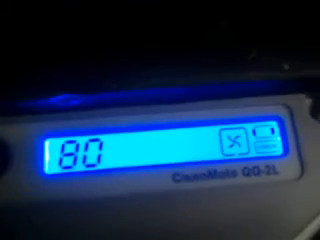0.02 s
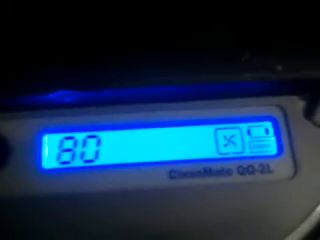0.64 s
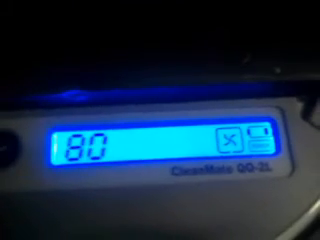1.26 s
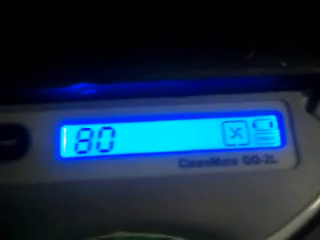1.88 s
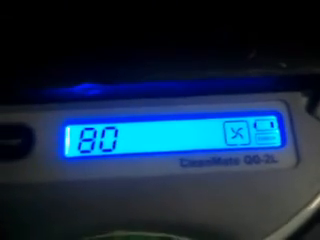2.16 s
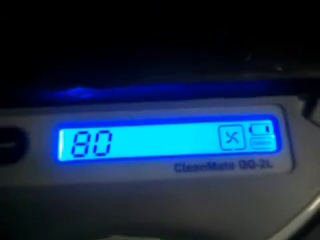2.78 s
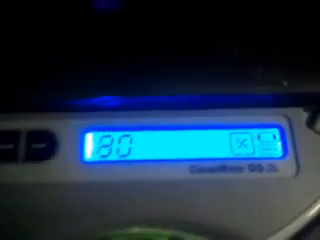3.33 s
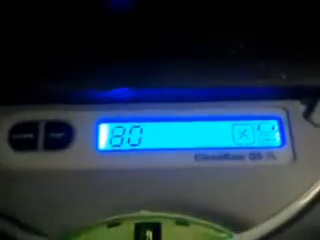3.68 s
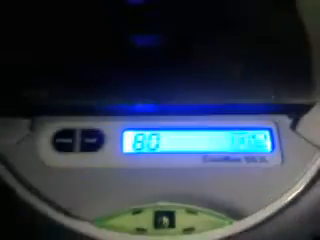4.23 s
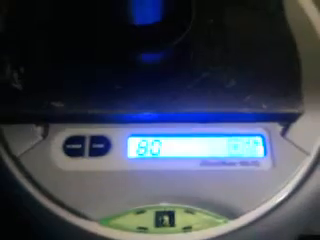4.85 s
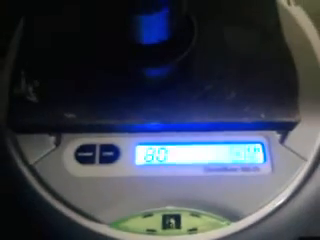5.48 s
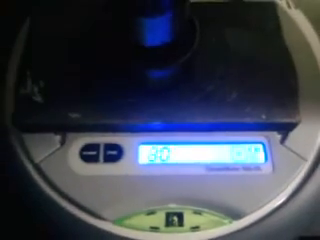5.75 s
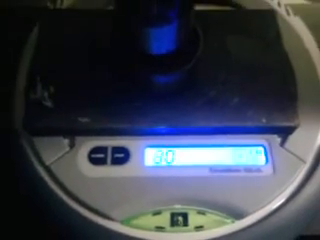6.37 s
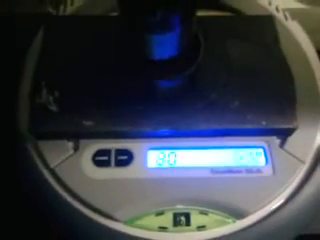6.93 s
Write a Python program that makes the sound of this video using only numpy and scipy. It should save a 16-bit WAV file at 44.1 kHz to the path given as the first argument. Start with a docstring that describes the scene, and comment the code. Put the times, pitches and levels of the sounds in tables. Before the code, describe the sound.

A robot vacuum runs very close, its slipping gear rattling loudly about ten times a second over a steady motor hum and rushing fan.

```python
"""A small room, with a narrow-band camera microphone very close to a running robot vacuum.
Its stripped gear skips about ten times a second, each skip a knock and a short rasp of teeth
in the plastic shell, loud enough to overload the microphone. Behind it the motor hums steadily,
the fan rushes and loose plastic ticks. About halfway through, the microphone draws back
from the vacuum's display to above its lid, and the colour of the sound shifts."""
import sys
import numpy as np
from scipy import signal
from scipy.fft import rfft, irfft
from scipy.io import wavfile
from scipy.ndimage import uniform_filter1d

SR = 44100
rng = np.random.default_rng(int(sys.argv[2]) if len(sys.argv) > 2 else 0)


def bounce(signal):
    """Save signal as a 16-bit WAV file at the path given by the first command-line argument."""
    frames = np.transpose(np.atleast_2d(signal))
    limited = np.clip(frames, -1, 1)
    pcm = np.round(limited * 32767).astype(np.int16)
    wavfile.write(sys.argv[1], SR, pcm)


N = 308700
TIME, FREQS = np.arange(N) / SR, np.fft.rfftfreq(N, 1 / SR)

# the stripped gear slowly runs down: (time [s], speed [turns/s])
GEAR_SPEED = [(0.0, 11.147), (0.7, 10.578), (1.1, 10.856), (3.1, 10.609), (3.5, 10.631), (3.9, 10.408),
              (4.3, 10.474), (5.5, 10.432), (6.1, 10.228), (7.0, 10.191)]
# load on the gear, which sets the force of its skips: (time [s], level [dB])
GEAR_LOAD = [(0.0, -9), (0.6, -10.5), (1.3, -8), (2.1, -8), (3.1, -10), (4.7, -9), (5.35, -6.5),
             (5.8, -8.5), (6.4, -7), (7.0, -6.5)]
# the gear bites hard or only slithers: (time [s], force above the load [dB])
ODD_SKIPS = [(0, -6.5), (0.35, -2), (0.445, 4), (1.283, 2.5), (1.65, -5.5), (1.744, -2.5), (2.303, -2.5),
             (2.391, -2), (2.49, 4), (3.621, 2.5), (4.194, 2), (6.6, -2)]
# force through one skip: (time [share of its length], level [dB])
SKIP_ENVELOPE = [(0, -19), (.03, -5.5), (.2, -1.4), (.5, 1), (.75, -1.5), (1.1, -7), (1.35, -12.5),
                 (1.9, -38)]
# a single tooth catches between skips: (time [s], force [dB])
TOOTH_SNAGS = [(6.773, -2)]
# colour of the plastic shell: (frequency [Hz], level [dB])
SHELL_COLOUR = [(40, -23), (100, -9), (250, -15.5), (500, -8.5), (900, -10.5), (1400, -7), (2100, -1.5),
                (2600, 0.5), (3000, -3.5), (3500, -2), (5000, -14)]
# shell resonances: (frequency [Hz], width [Hz], lift at the display [dB], lift above the lid [dB])
SHELL_MODES = [(1252, 42, 3.5, 6), (1377, 100, 5, 3.5), (1543, 110, 1.5, 3.5), (1678, 35, 4, 3.5),
               (1837, 52, 0, 3), (2070, 59, 3.5, 6.5), (2295, 70, 3, 4), (2507, 45, 3, 6),
               (3375, 164, 5.5, 1.5)]
# a hollow mid ring comes and goes as the microphone moves: (time [s], ring added [share])
HOLLOW_RING = [(0, 0.49), (3.8, 0), (4.15, 0.66), (4.6, 0.84), (5.2, 0.55), (7, 0)]
# dull thud of the jolted chassis: (frequency [Hz], level [dB])
CHASSIS_COLOUR = [(20, -27), (50, -8), (85, 0), (130, -3), (250, -27), (800, -55)]
# motor hum: (harmonic [multiple of shaft speed], level at the display [dB], level above the lid [dB])
HUM_HARMONICS = [(8, -39.5, -53), (10, -36, -36), (12, -36.5, -29.5), (13, -31, -28), (14, -34, -30.5),
                 (17, -24, -25.5), (18, -34.5, -28), (19, -30, -29.5), (20, -40, -55), (22, -55, -33),
                 (23, -39.5, -33), (29, -40, -31.5), (30, -58, -29.5), (31, -37, -41), (32, -41.5, -49),
                 (36, -32, -27), (42, -46.5, -39), (49, -54, -41.5), (50, -45, -36), (53, -34, -51)]
# rush of fan and brushes: (frequency [Hz], level at the display [dB], level above the lid [dB])
RUSH_COLOUR = [(20, -48, -19), (61, -3.5, -13), (122, -9, -3), (189, 2, 2.5), (310, -0.5, 0),
               (460, 0.5, 0.5), (706, -0.5, 1), (890, -5.5, -0.5), (1110, 1, 1), (1470, -5, -4),
               (2090, -3.5, -3.5), (2670, -4, -13.5), (3210, -15, -3), (3500, -16.5, -14.5)]
# air resonances of the dust bin: (frequency [Hz], width [Hz], lift [dB])
BIN_MODES = [(352.4, 22.3, 11.5), (388, 90, 8)]
# the microphone draws back from the display to above the lid: (time [s], distance [share of the way])
MIC_PATH = [(0, 0.039), (3.2, 0), (4.3, 0.93), (7, 0.97)]
# the microphone passes little above the speech band: (frequency [Hz], gain [dB])
MIC_RESPONSE = [(3450, -1), (3650, -10), (4000, -16), (4400, -25.5), (4800, -60), (6000, -70)]


def gear(away, knock_db=12.5, rasp_db=2.0, thud_db=-32):
    """Up close, the stripped gear lets go with a knock, rasps in the shell and jolts the chassis."""
    share, envelope_db = np.transpose(SKIP_ENVELOPE)
    force, knocks = np.zeros(N), np.zeros(N)
    t = np.arange(SR // 10) / SR
    strokes = skips()
    for s, db, length in strokes:
        add(force, s, amp(db + np.interp(t / length, share, envelope_db, right=-100)))
    for s, db, *_ in strokes + list(TOOTH_SNAGS):
        add(knocks, s, amp([db + knock_db]))
    thud = force * unit(colour(rng.standard_normal(N), contour(CHASSIS_COLOUR)))
    rasp = shell(room(force * teeth() + knocks), away)
    return amp(rasp_db) * rasp + amp(thud_db) * thud


def skips(start_turn=0.139, skip_s=0.037, drag_per_db=0.06, lead=0.6, scatter_db=0.55, scatter_s=0.0007):
    """The gear skips once a turn: (time [s], force [dB], length [s]) for each skip."""
    turns = start_turn + np.cumsum(along(GEAR_SPEED, TIME)) / SR
    first_s = -start_turn / GEAR_SPEED[0][1]
    times = np.interp(np.arange(int(turns[-1]) + 1), turns, TIME, left=first_s)
    chance_force, chance_time = rng.standard_normal((len(times), 2)).T
    bite_db = scatter_db * chance_force
    for s, db in ODD_SKIPS:
        bite_db[np.argmin(abs(times - s))] += db
    lengths = skip_s * np.exp(-drag_per_db * bite_db)  # weak skips drag on
    starts = times - lead * (lengths - skip_s) + scatter_s * chance_time  # and let go early
    return list(zip(starts, along(GEAR_LOAD, times) + bite_db, lengths))


def teeth(tooth_hz=372.7, jitter=0.12, chatter_s=0.0013, scrape=1.0):
    """Each tooth jumps past with a brief chatter; between teeth the tips scrape."""
    passed = np.cumsum(tooth_hz * np.exp(jitter * drift(150))) / SR
    since_s = passed % 1 / tooth_hz
    friction = shifting_contact(rng.standard_normal(N))
    return unit((scrape + np.exp(-since_s / chatter_s)) * friction)


def shifting_contact(x, patch_db=2.0, patch_cells=9):
    """The teeth keep meeting at new spots, so the colour of the rasp shifts at random."""
    spectra = signal.stft(x, nperseg=1024)[2]
    patches = rng.standard_normal(spectra.shape)
    for axis in (0, 1):  # smooth over frequency, then time
        patches = uniform_filter1d(patches, patch_cells, axis)
    shifted = signal.istft(spectra * amp(patch_db * unit(patches)))[1]
    return unit(shifted[:N])


def shell(x, away, hollow_hz=1830, hollow_q=3):
    """The plastic shell colours a force; its resonances differ with the microphone's position."""
    modes = np.array(SHELL_MODES)
    near_db, far_db = (contour(SHELL_COLOUR, modes[:, [0, 1, place]]) for place in (2, 3))
    rms_at_mic = np.sqrt(np.mean(amp(near_db + contour(MIC_RESPONSE)) ** 2))
    ring = signal.lfilter(*signal.iirpeak(hollow_hz, hollow_q, fs=SR), x)
    x = x + along(HOLLOW_RING, TIME) * ring
    return ((1 - away) * colour(x, near_db) + away * colour(x, far_db)) / rms_at_mic


def motor(away, shaft_hz=21.235, hum_db=0.87, wow=0.00075, waver_db=1.86, throb_db=1.73, throb_hz=18):
    """The motor hums at multiples of its shaft speed, roughly in step, so it pulses once a turn."""
    turns = np.cumsum(shaft_hz * (1 + wow * drift(3.1))) / SR
    hum = np.zeros(N)
    for multiple, near_db, far_db in HUM_HARMONICS:
        level = amp(hum_db + near_db + (far_db - near_db) * away + waver_db * drift(20))
        lag_cycles = 0.15 * rng.standard_normal()
        hum += level * np.sqrt(2) * np.sin(2 * np.pi * (round(multiple) * turns + lag_cycles))
    return hum * amp(throb_db * drift(throb_hz))  # the uneven load shakes all of the hum together


def fan(away, rush_db=-18.0, flutter_db=2.0, flutter_hz=47):
    """Behind the gear, turbulent air booms in the dust bin and flutters over the brushes."""
    rush = np.array(RUSH_COLOUR)
    air = rng.standard_normal(N) * amp(flutter_db * drift(flutter_hz))
    near, far = (colour(air, contour(rush[:, [0, place]], BIN_MODES)) for place in (1, 2))
    rms_at_mic = np.std(colour(near, contour(MIC_RESPONSE)))
    return amp(rush_db) * ((1 - away) * near + away * far) / rms_at_mic


def loose_parts(away, ticks_per_s=160, spread_db=3.0, tick_db=-27):
    """In the background, loose plastic ticks faintly against the shell all the time."""
    blows = (rng.random(N) < ticks_per_s / SR) * rng.choice([-1, 1], N)
    strength = amp(spread_db * np.minimum(rng.exponential(1, N), 4))
    ticks = unit(room(blows * strength, t60_s=0.035, wet_db=0))
    return amp(tick_db) * shell(ticks, away)


def room(x, t60_s=0.2, wet_db=-9):
    """The small room stores the power of a sound and lets it die away as diffuse noise."""
    keep = amp(-60 / (t60_s * SR)) ** 2
    stored = signal.lfilter([1 - keep], [1, -keep], x ** 2)
    return x + amp(wet_db) * np.sqrt(stored) * rng.standard_normal(N)


def limiter(x, threshold_db=-12.5, share=0.3, attack_s=0.0014, recover_db_per_s=100):
    """The gain drops on each loud skip, so the hum ducks and swells back between them."""
    keep = np.exp(-1 / (attack_s * SR))
    power_db = 10 * np.log10(signal.lfilter([1 - keep], [1, -keep], x ** 2) + 1e-12)
    fall_db = recover_db_per_s * TIME
    held_db = np.maximum.accumulate(power_db + fall_db) - fall_db
    return x * amp(-share * np.maximum(held_db - threshold_db, 0))


def amp(db):
    """Decibels to gain."""
    return 10 ** (np.asarray(db) / 20)


def unit(x):
    """Scales to rms 1."""
    return x / np.sqrt(np.mean(x ** 2) + 1e-20)


def along(points, times):
    """Value of a (time, value) table at the given times."""
    return np.interp(times, *np.transpose(points))


def contour(points, modes=()):
    """Gain in dB at every frequency: a smooth outline plus resonance humps."""
    hz, db = np.transpose(points)
    outline = np.interp(np.log(FREQS + 1), np.log(hz + 1), db)
    return outline + sum(lift / (1 + (2 * (FREQS - f) / width) ** 2) for f, width, lift in modes)


def colour(x, db):
    """Causal filter with the given gain: resonances ring after a blow, never before."""
    cepstrum = irfft(db * np.log(10) / 20, N)
    cepstrum[1:N // 2] *= 2
    cepstrum[N // 2 + 1:] = 0
    return irfft(rfft(x) * np.exp(rfft(cepstrum)), N)


def drift(rate_hz):
    """Slow random wander of rms 1."""
    spectrum = rfft(rng.standard_normal(N))
    return unit(irfft(spectrum * np.exp(-(FREQS / rate_hz) ** 2), N))


def add(mix, s, sound):
    """Mixes a sound in at time s."""
    start = round(s * SR)
    sound = sound[max(-start, 0):]
    part = mix[max(start, 0):][:len(sound)]
    part += sound[:len(part)]


def scene():
    """Gear, motor, fan and loose parts at one close, moving microphone."""
    away = np.clip(along(MIC_PATH, TIME), 0, 1)  # 0 at the display, 1 above the lid
    return (gear(away) + motor(away) + fan(away) + loose_parts(away))[None]


def record(dry, drive_db=1.0, ceiling=0.73, knee=17, cutoff_hz=15800):
    """The narrow-band microphone overloads on the skips despite its limiter, making the high treble."""
    narrow = limiter(amp(drive_db) * colour(dry[0], contour(MIC_RESPONSE)))
    overloaded = narrow / (2 + abs(narrow / ceiling) ** knee) ** (1 / knee)
    low_pass = signal.firwin(511, cutoff_hz, window=("kaiser", 9), fs=SR)
    return signal.oaconvolve(overloaded, low_pass, "same")[None]


dry = scene()
out = record(dry)
bounce(out)
```